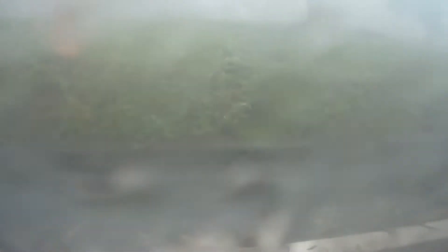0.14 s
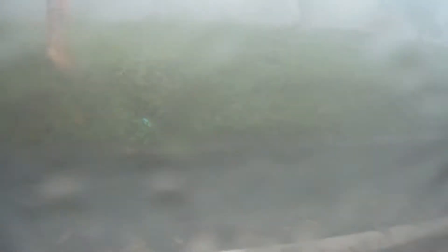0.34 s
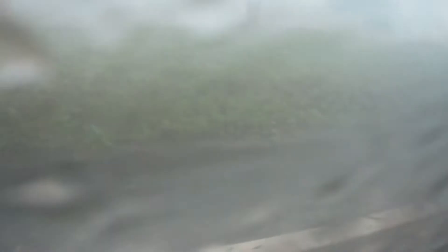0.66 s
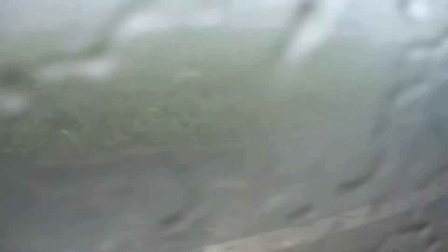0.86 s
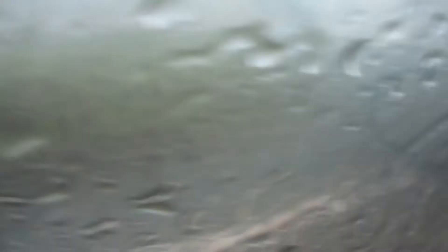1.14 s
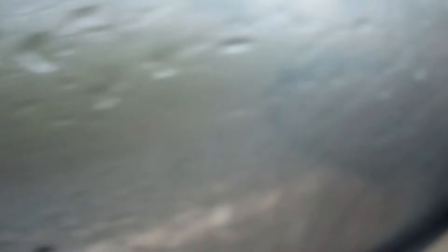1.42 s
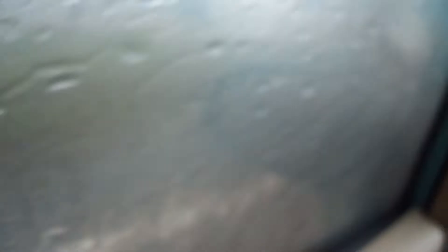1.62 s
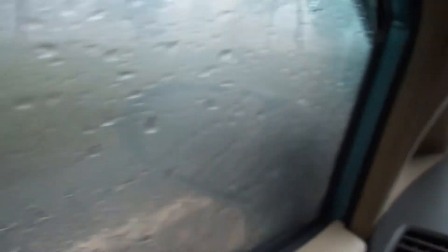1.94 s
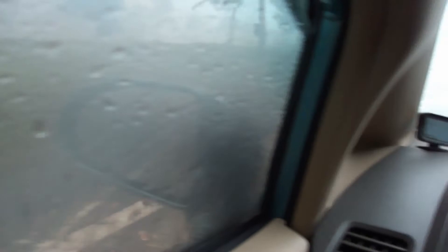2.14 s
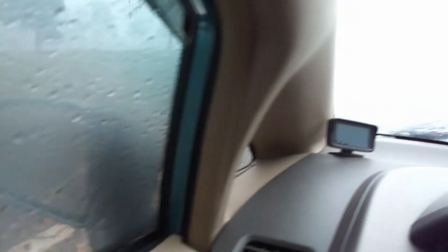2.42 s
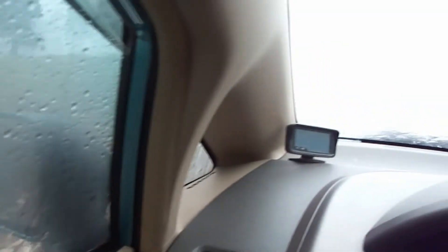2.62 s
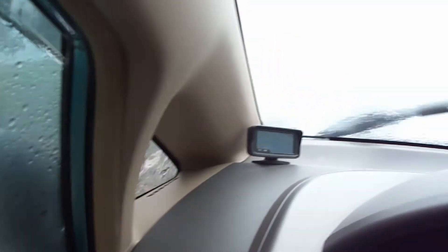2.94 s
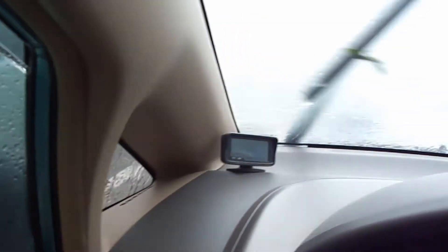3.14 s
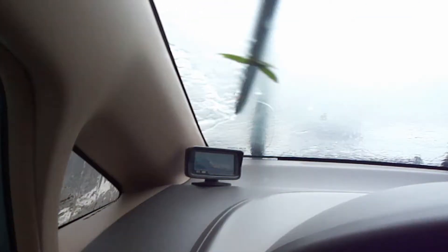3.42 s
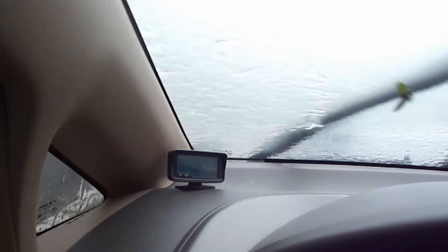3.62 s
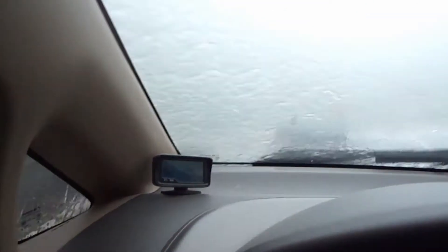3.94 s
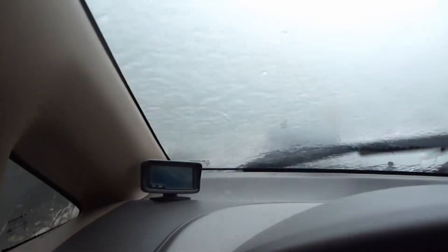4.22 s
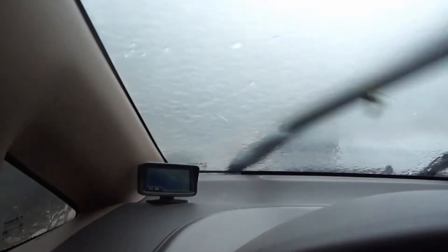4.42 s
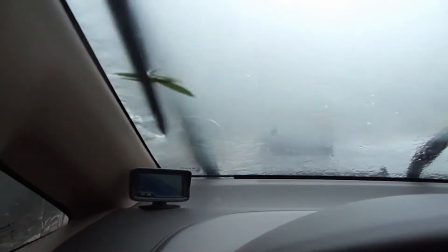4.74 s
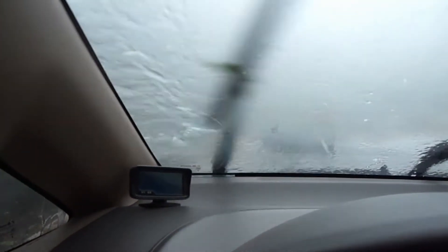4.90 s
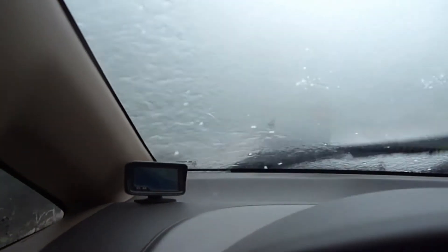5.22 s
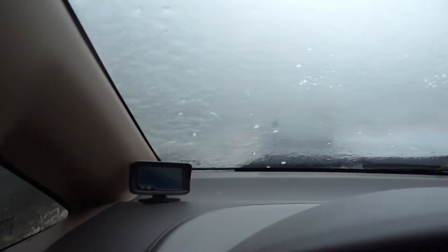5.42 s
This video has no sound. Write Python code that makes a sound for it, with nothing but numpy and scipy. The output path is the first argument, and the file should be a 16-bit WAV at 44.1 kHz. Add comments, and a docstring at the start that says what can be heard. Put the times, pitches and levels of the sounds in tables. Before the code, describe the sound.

A heavy hailstorm beats on a car, captured by a small handheld microphone in the cabin. It begins with more roof and door-panel knocking, low and woody-metallic, then turns glassier as it moves toward the windscreen. Irregular hard cracks leap out, the loudest in clusters, while the smaller rattle briefly ducks around them. Smooth rain hiss and fine ticking continue throughout, and the sound ends with the storm still falling.

```python
"""Hail cracks sharply on the glass of a car and knocks dully on its lined steel roof, heard from the front seat.
Countless smaller stones merge into a clatter that flickers in level and dips briefly, mostly around the
hardest cracks, over the hiss of rain and fine spray.
Big stones are timed bursts of coloured noise and a few modes; knocks and pings are dying sines.
The clatter sends random impulses through panel responses; loudness-following noise adds cabin reflections."""
import sys
import numpy as np
from scipy import signal
from scipy.fft import rfft, irfft, next_fast_len
from scipy.io import wavfile
from scipy.ndimage import uniform_filter1d

SR = 44100
rng = np.random.default_rng(int(sys.argv[2]) if len(sys.argv) > 2 else 0)


def master_out(mix):
    """Clip the mix to full scale and print it as 16-bit PCM to the path in sys.argv[1]."""
    frames = np.transpose(np.atleast_2d(mix))
    ceiling = np.clip(frames, -1, 1)
    pcm = np.round(ceiling * 32767).astype(np.int16)
    wavfile.write(sys.argv[1], SR, pcm)


N = 245637

# All levels below are relative; the layers get further gains when they are mixed.
# Strength of the shower on each surface. Each row: time in seconds, roof level in dB,
# thin body panel level in dB, glass level in dB.
SHOWER_STRENGTH = [(0.0, -28.5, -30.5, -29.5), (0.31, -32.5, -28, -30.5), (0.81, -33.5, -32.5, -30),
                   (1.16, -32.5, -32, -28.5), (1.43, -32, -29.5, -29), (1.6, -31.5, -31, -27.5),
                   (1.81, -33, -33.5, -29.5), (2.3, -34, -33.5, -30.5), (2.73, -36, -29.5, -29.5),
                   (3.02, -40.5, -32, -31.5), (3.54, -35.5, -34, -29.5), (3.94, -37, -29.5, -28.5),
                   (4.2, -34.5, -31.5, -32.5), (4.62, -37, -30, -29), (4.7, -35, -31.5, -31),
                   (5.14, -40, -32.5, -33), (5.57, -40, -34.5, -34.5)]
# The level of the clatter dips briefly, mostly around the hardest cracks.
# Each row: start in seconds, end in seconds, depth in dB before each surface takes its share.
CLATTER_DIPS = [(0.02, 0.06, 1), (0.537, 0.668, 2), (0.766, 0.87, 1.5), (1.17, 1.208, 3), (1.353, 1.68, 6),
                (1.784, 1.798, 9), (3.183, 3.252, 1.5), (3.486, 3.52, 2), (3.773, 3.957, 6.5),
                (3.98, 4.03, 2.5), (4.768, 4.898, 4), (5.058, 5.287, 5.5)]
# The largest stones on the glass. Each row: start in seconds, crack peak in dB, ring rms in dB,
# colour centre in Hz, which crack and ring each shift.
GLASS_HITS = [(0.0067, -20, -21.5, 2980), (0.107, -14, -27, 3040), (0.1526, -18, -28, 3380),
              (0.1837, -15, -25, 4150), (0.1946, -9, -45, 4500), (0.2862, -22, -24, 3320),
              (0.3075, -15, -23.5, 5200), (0.343, -10, -26, 4450), (0.36, -10, -23.5, 3950),
              (0.462, -11, -29, 5200), (0.5343, -1, -25, 3960), (0.672, -12, -20.5, 3260),
              (0.6871, -12, -21, 2880), (0.7046, -19, -24, 2830), (0.9141, -0.5, -35, 3940),
              (0.9557, -11, -42, 5000), (1.001, -12, -25, 3300), (1.0416, -23, -25, 3950),
              (1.0725, -8.5, -32, 5030), (1.1238, -15, -26, 4140), (1.174, -7, -41, 4740),
              (1.235, -8, -21, 3550), (1.262, -10, -28, 3420), (1.2682, -12, -29, 5140),
              (1.303, -11, -22, 3400), (1.341, -28, -20.5, 3990), (1.416, 1, -25, 4060),
              (1.486, -13, -21, 2970), (1.4913, 0, -18, 4040), (1.5719, -2, -20, 4330),
              (1.6081, -4.5, -23.5, 5230), (1.6458, -15, -28.5, 4070), (1.6842, -5, -20, 3710),
              (1.7081, -3, -34, 4560), (1.7179, -8, -30, 4030), (1.7245, -9, -16, 3780),
              (1.7715, -13, -32, 3800), (1.8015, -10, -27, 2940), (1.852, -16, -22.5, 3290),
              (1.891, -36, -19, 3880), (2.0175, -14, -36, 4200), (2.0264, -7, -22.5, 3500),
              (2.041, -11, -18, 3880), (2.069, -5, -26, 4200), (2.237, -35, -21, 3720),
              (2.3162, -22, -23, 3630), (2.3336, -18, -29, 4180), (2.4, -16, -18.5, 3640),
              (2.483, -18, -22, 2980), (2.5498, -28, -25, 2990), (2.685, -18, -23, 4900),
              (2.7091, -2.5, -28, 4200), (2.7196, -14, -30, 3800), (2.7514, -20, -23.5, 3520),
              (2.837, -7, -25, 3560), (2.9344, -23, -26, 3150), (2.992, -5.5, -21.5, 4020),
              (3.011, -6.5, -22.5, 3530), (3.0496, -14, -36, 4940), (3.094, -12, -22.5, 4200),
              (3.135, -20, -21, 2980), (3.1512, -12, -28, 3460), (3.1602, -16, -27, 3540),
              (3.1684, -11, -19.5, 3100), (3.18, -6.5, -24, 3880), (3.3457, -12, -17, 3550),
              (3.401, -30, -22, 3620), (3.431, -14.5, -22.5, 6100), (3.564, -16, -30, 2590),
              (3.614, -10, -24, 1990), (3.678, -18, -20, 2950), (3.7244, -12, -21, 2990),
              (3.8037, -1.5, -16, 3640), (3.83, -4.5, -17.5, 4760), (3.8336, -5, -23, 4200),
              (3.8732, -2, -21, 4420), (3.9581, -11, -22, 3930), (3.9652, -5, -16.5, 3500),
              (3.9772, -8, -22, 3970), (3.9933, 1, -20, 3300), (4.0462, -6, -17.5, 3500),
              (4.074, -11, -19.5, 3870), (4.104, -4, -17.5, 3280), (4.117, -6, -22, 4950),
              (4.2463, -18, -21.5, 3530), (4.29, -11, -38, 3730), (4.3548, -12, -40, 5040),
              (4.4714, -23, -22, 3230), (4.491, -1.5, -33, 3680), (4.532, -19, -28, 3980),
              (4.5422, -14, -24, 4260), (4.58, -21, -22, 3140), (4.6326, -12, -22.5, 3800),
              (4.672, -5.5, -23, 4560), (5.1035, -1, -24, 4400), (5.139, -2.5, -20, 4200),
              (5.1842, -16, -23, 3320), (5.215, -6, -18, 3500), (5.2966, -3.5, -20, 3840),
              (5.324, -4.5, -23, 2640), (5.3486, -3.5, -33, 4100), (5.364, -7, -24, 3950),
              (5.3706, -3, -15.5, 3480), (5.548, -28, -23, 3730)]
# The largest stones on the roof. Each row: start in seconds, thud rms in dB, clank rms in dB,
# thud pitch in Hz, clank pitch in Hz.
ROOF_HITS = [(0.007, -26, -34, 686, 1310), (0.076, -27, -29, 650.0, 1460), (0.187, -30, -34, 754, 1340.0),
             (0.213, -26, -53, 700.0, 1550.0), (0.238, -28, -35, 520, 1100), (0.2483, -21, -30, 800, 1050),
             (0.329, -28, -48, 580.0, 1270), (0.386, -26.5, -31, 730.0, 1390),
             (0.437, -28.5, -28, 740.0, 1430), (0.512, -33, -24.5, 680.0, 1546),
             (0.579, -31, -32, 670.0, 1400), (0.688, -28, -30, 710.0, 1560), (0.698, -21.5, -34, 716, 1500),
             (0.834, -35.5, -37, 780, 1300), (0.879, -30, -27.5, 720.0, 1610),
             (1.0603, -24.5, -25.5, 536, 1620), (1.115, -27, -32, 690.0, 1520),
             (1.28, -30.5, -33.5, 780, 1310), (1.31, -29, -23.5, 634, 1550), (1.741, -36, -34, 520.0, 1950),
             (1.849, -36, -29.5, 620.0, 1710), (1.953, -28.5, -36, 605, 1420),
             (2.13, -30.5, -32.5, 610.0, 1680), (2.216, -27, -27, 650.0, 1676),
             (2.334, -39, -41, 700, 1180), (2.368, -34.5, -30, 560.0, 1520),
             (2.394, -33.5, -34, 560.0, 1780), (2.642, -28.5, -35.5, 480, 1610),
             (2.773, -34, -38, 440.0, 1640.0), (2.894, -34, -26.5, 507, 1590), (2.931, -33, -35, 750, 1110),
             (2.956, -42, -32.5, 750.0, 1430), (3.142, -50, -32.5, 710.0, 1940),
             (3.232, -33.5, -35, 640.0, 1640.0), (3.283, -32.5, -30, 700, 1310),
             (3.304, -27.5, -28, 600.0, 1380), (3.425, -43, -31, 700, 1200), (3.443, -25, -24, 550.0, 1196),
             (3.564, -33, -24.5, 780.0, 1560), (3.611, -25, -29.5, 610, 1580), (3.724, -38, -40, 700, 1330),
             (3.96, -29.5, -34, 710, 1530.0), (4.046, -37, -31, 563, 1670.0), (4.143, -35, -26, 523, 1360),
             (4.246, -40, -31, 500.0, 1770), (4.283, -28, -28, 716, 1500), (4.349, -49, -32, 640.0, 1560),
             (4.4712, -23.5, -20.5, 580.0, 1730), (4.713, -44, -27.5, 620.0, 1200),
             (4.739, -28.5, -28.5, 620.0, 1580.0), (4.795, -38, -32, 580.0, 1580),
             (4.859, -39, -32.5, 850.0, 1470), (4.965, -30, -25, 770.0, 1740),
             (5.258, -36, -36.5, 700, 1510), (5.31, -29.5, -28, 523, 1530),
             (5.428, -48, -32.5, 550.0, 1740), (5.455, -30, -29, 570.0, 1530.0),
             (5.533, -43, -28.5, 550.0, 1370)]
# Stones on stiff spots of steel, which answer with one short pitched knock.
# Each row: start in seconds, main mode level in dB, pitch in Hz, t60 in seconds.
STEEL_KNOCKS = [(0.007, -8.5, 740, 0.034), (0.071, -16.5, 2570, 0.12), (0.102, -15, 2630, .05),
                (0.198, -12, 884, 0.028), (0.249, -0.5, 826, 0.031), (0.297, -13, 826, 0.056),
                (0.3015, -5, 1450, 0.011), (0.34, -16, 1180, 0.029), (0.439, -16, 740, 0.09),
                (0.578, -13, 1270, 0.028), (0.694, -13.5, 370, .04), (0.7004, -12, 733, 0.037),
                (0.914, -11, 700, 0.014), (1.061, -14, 1950, .03), (1.0615, -20, 364, .04),
                (1.067, -14, 590, 0.018), (1.172, -7.5, 1150, 0.022), (1.3105, -11, 1760, 0.025),
                (1.491, -11, 1020, 0.01), (1.743, -13, 380, 0.012), (1.954, -13.5, 900, 0.011),
                (2.222, -19, 1880, 0.04), (2.954, -13, 1120, 0.014), (3.57, -12, 2240, 0.039),
                (3.444, -11, 1040, .03), (3.612, -5.5, 1580, 0.033), (3.68, -12, 1870, .02),
                (3.806, -17, 1400, .018), (3.8345, -16, 1050, .014), (3.8736, -10, 420, 0.0072),
                (3.874, -7, 990, 0.007), (3.9605, -15, 1000, .02), (4.047, -21, 1100, 0.0091),
                (4.104, -12, 1490, .015), (4.355, -8, 990, 0.0076), (4.4712, -7.5, 1940, 0.049),
                (4.477, -24, 1550, 0.0072), (4.472, -15, 340, 0.032), (4.7139, -6, 1200, .018),
                (4.927, -15.5, 1520, 0.018), (4.963, -10.5, 850, 0.042), (5.139, -14, 1600, 0.019),
                (5.2155, -17, 1970, .016), (5.429, -11, 1590, 0.015)]
# Heavy stones that set a whole panel bumping.
# Each row: start in seconds, main mode level in dB, pitch in Hz, t60 in seconds.
PANEL_BUMPS = [(0.033, -29, 186, 0.081), (0.245, -39, 203, .08), (1.303, -32.5, 182, .07),
               (1.742, -27, 165, 0.037), (2.225, -30, 215, 0.067), (3.874, -26.5, 192, 0.036),
               (4.076, -35, 192, 0.054), (4.301, -33, 185, 0.11)]
# Stones that leave the glass ringing on one note.
# Each row: start in seconds, level in dB, pitch in Hz, t60 in seconds.
GLASS_PINGS = [(0.704, -14, 2600, .04), (1.341, -15, 4490, .045), (1.4165, -11, 4200, 0.018),
               (1.4915, -10, 4690, 0.045), (1.493, -9, 4000, 0.027), (1.6842, -7, 3510, 0.017),
               (1.7996, -12.5, 3200, 0.029), (2.028, -17, 2540, .04), (2.041, -13, 3960, .035),
               (3.806, -12, 3200, .014), (3.907, -15, 2980, .014), (4.586, -14, 2870, .03),
               (5.1035, -26, 3900, 0.02), (5.139, -13, 2640, 0.013), (5.139, -7.5, 6050, 0.01),
               (5.216, -8.5, 4400, 0.02), (5.372, -12, 3070, 0.026)]
# Resonances of the steel. Each row: centre in Hz, width in Hz, gain in dB.
STEEL_MODES = [(740, 240, 2), (1500, 35, -1), (1975, 37, 8), (2640, 240, 0)]
# The microphone turns from the door to the windscreen.
# Each row: time in seconds, share of the steel resonances heard (0 to 1).
NEAR_DOOR = [(0, 0.86), (1.3, 0.84), (1.7, 0.24), (5.57, 0.37)]
# What the lined roof radiates into the cabin. Each row: frequency in Hz, relative level in dB.
ROOF_SPECTRUM = [(25, -59), (70, -39), (120, -30), (190, -14), (300, -7), (400, -1), (580, -1.5),
                 (740, -4.5), (950, -7), (1400, -11), (3000, -44), (16000, -54)]
# What the thin panels radiate, also the colour of the clanks. Each row: frequency in Hz, relative level in dB.
PANEL_SPECTRUM = [(100, -44), (500, -12), (900, -6), (1150, 2), (1500, -0.5), (2000, -0.5), (2600, -2.5),
                  (4000, -2.5), (8000, -18), (16000, -62)]
# What the glass radiates under small stones. Each row: frequency in Hz, relative level in dB.
GLASS_SPECTRUM = [(100, -38), (600, -21), (1600, -13), (2300, -7), (2900, 0), (4200, -1.5), (5200, -6),
                  (7000, -11), (9000, -15.5), (16000, -20)]
# Crack and ring of the large stones on glass. Each row: frequency in Hz, relative level in dB.
CRACK_SPECTRUM = [(30, -43), (120, -14), (400, -6), (1000, -4), (2000, -1.5), (3200, 0), (4500, -3),
                  (7000, -7.5), (16000, -25)]
# The soft boom of the whole body. Each row: frequency in Hz, relative level in dB.
BOOM_SPECTRUM = [(25, -31), (60, -20), (100, -17), (170, -3), (230, 1.5), (320, -1.5), (700, -24),
                 (16000, -92)]
# The hiss of the rain. Each row: frequency in Hz, relative level in dB.
HISS_SPECTRUM = [(100, -35), (500, -7), (1500, -6.5), (3200, 1), (5000, -9), (8000, -11.5), (16000, -33)]
# Fine drops and splinters on the windscreen. Each row: frequency in Hz, relative level in dB.
SPRAY_SPECTRUM = [(500, -40), (3000, -2), (6500, 0), (9000, 0), (11500, 1), (13500, 5.5), (16000, 5.5)]
# Reflections from all round the cabin. Each row: frequency in Hz, relative level in dB.
DIFFUSE_SPECTRUM = [(30, -13), (60, -7), (110, 1), (200, 7), (450, 7), (900, 1), (2000, 5), (4000, 12.5),
                    (8000, 6.5), (16000, -4.5)]

CUTOFF_HZ = 16000
BLOW_SIZE, TONE_SIZE = 8192, 2600  # longest blow and longest pitched tone, in samples
AGE = np.arange(BLOW_SIZE) / SR  # seconds since a blow landed
DIP_FADE_S = 0.025
# The level of the small stones swings quickly at random throughout; the spray swings more quickly still.
SWINGS_PER_S, SWING_DB = 29, 1
SPRAY_SWINGS_PER_S, SPRAY_SWING_DB = 130, 1.2
# A stone that bursts on the roof throws splinters: they add to the clatter, then die away.
SPLINTER_RISE_S, SPLINTER_FALL_S = 0.0037, 0.02
# A stone that bursts on the glass throws fine chips: level against its crack, time constant of the fall.
CHIPS_DB, CHIPS_FALL_S = -28, 0.005
# Hiss and spray follow the level of the hail on the glass: share of its swing in dB.
HISS_FOLLOWS, SPRAY_FOLLOWS = 0.77, 0.6
SPRAY_DB = -44.2
# A hard crack is over sooner than a soft splat: ring time at 0 dB, and the rise in peak that halves it.
RING_T60_S, RING_HALVES_DB = 0.032, 17
# A knock has a second, inharmonic mode that dies sooner.
OVERTONE_RATIO, OVERTONE_DB, OVERTONE_T60_SHARE = 1.7, 1, 0.14
KNOCK_BASS_CUT_HZ = 260


def from_db(db):
    """Decibels to an amplitude factor."""
    return 10 ** (np.asarray(db) / 20)


def rms_one(x):
    """Scale a sound to rms 1."""
    return x / np.sqrt(np.mean(x ** 2) + 1e-20)


def add(out, s, sound):
    """Mix a sound in at a time in seconds."""
    start = int(np.clip(round(s * SR), 0, N - 1))
    out[start:start + len(sound)] += sound[:N - start]


def in_time(rows):
    """The columns of a curve, sample by sample."""
    s, *columns = np.transpose(rows)
    return [np.interp(np.arange(N) / SR, s, column) for column in columns]


def colour(x, spectrum, centre_hz=1000, bump_db=0, octaves=1.0):
    """Causal (minimum-phase) filter: a spectrum with one broad resonance on top."""
    size = 2 * next_fast_len(len(x) // 2 + 1024)
    pitch = np.log2(np.maximum(np.arange(size // 2 + 1) * SR / size, 1))
    hz, db = np.transpose(spectrum)
    distance = (pitch - np.log2(centre_hz)) / octaves
    curve_db = np.interp(pitch, np.log2(hz), db) + bump_db * np.exp(-.5 * distance ** 2)
    # folding the cepstrum onto positive time gives the minimum phase
    cepstrum = irfft(np.log(from_db(curve_db)))
    cepstrum[1:size // 2] *= 2
    cepstrum[size // 2 + 1:] = 0
    response = np.exp(rfft(cepstrum))
    return irfft(rfft(x, size) * response, size)[:len(x)]


def ringing(t60, build_s):
    """Crowded modes and reflections after one blow: they build up, then die; energy 1."""
    dying = rng.standard_normal(BLOW_SIZE) * from_db(-60 * AGE / t60)
    ring = dying * (1 - np.exp(-AGE / build_s))
    return ring / np.linalg.norm(ring)


def blow(t60, build_s, direct_db, tail_db, tail_t60):
    """The contact itself, the ring of the panel and a second tail at a level of its own."""
    contact = from_db(direct_db) * (AGE == 0)
    tail = from_db(tail_db) * ringing(tail_t60, build_s)
    return contact + ringing(t60, build_s) + tail


def at_level(sound, db, first_s):
    """Scale a blow to an rms level over its first moments."""
    return from_db(db) * sound / np.sqrt(np.mean(sound[AGE < first_s] ** 2))


def partials(centre_hz, octaves, t60, count=3):
    """The few modes that the struck spot favours; energy 1."""
    hz = np.minimum(centre_hz * 2 ** rng.normal(0, octaves, (count, 1)), CUTOFF_HZ)
    signs = rng.choice([-1, 1], (count, 1))
    modes = np.sum(signs * np.sin(2 * np.pi * hz * AGE), axis=0)
    ring = modes * from_db(-60 * AGE / t60)
    return ring / np.linalg.norm(ring)


def bend(pulse, slowness, count=6):
    """Bending waves carry the highs faster than the lows: all-passes turn a pulse into a tiny chirp."""
    a = np.clip(slowness, 0, .9)
    return signal.sosfilt([[-a, 1, 0, 1, -a, 0]] * count, pulse)


def restrike(sound, within_s, again_db, count=3):
    """Weaker repeats just after a blow: pieces of the stone, or waves back from the edge of the panel."""
    out = sound.copy()
    lags = (rng.uniform(0.0968, 1, count) * within_s * SR).astype(int) + 1
    for lag in lags:
        out[lag:] += from_db(again_db + rng.normal(0, 2.5)) * sound[:-lag]
    return out


def resonance(x, hz, width_hz):
    """Two-pole band-pass with gain 1 on top."""
    r = np.exp(-np.pi * width_hz / SR)
    zeros = np.array([1, 0, -1]) * (1 - r * r) / 2
    poles = [1, -2 * r * np.cos(2 * np.pi * hz / SR), r * r]
    return signal.lfilter(zeros, poles, x)


def radiated(x):
    """A small ringing spot radiates little bass: a high-pass."""
    return signal.sosfilt(signal.butter(2, KNOCK_BASS_CUT_HZ, "high", fs=SR, output="sos"), x)


def dips():
    """How far the level of the clatter has dipped, in dB, with a short fade at either end of each dip."""
    s = np.arange(N) / SR
    dip_db = np.zeros(N)
    for start, end, depth_db in CLATTER_DIPS:
        inside_s = np.minimum(s - start, end - s)
        dip_db += depth_db * np.clip(inside_s / DIP_FADE_S + .5, 0, 1)
    return dip_db


def swings(per_s, depth_db):
    """Quick swings in level, in dB: straight lines between random steps."""
    steps = rng.standard_normal(1000)
    return depth_db * np.interp(np.arange(N) / SR * per_s, np.arange(len(steps)), steps)


def splinters():
    """Amplitude of the patter after the stones on the roof; a louder clank throws more."""
    puff = (1 - np.exp(-AGE / SPLINTER_RISE_S)) * np.exp(-AGE / SPLINTER_FALL_S)
    out = np.zeros(N)
    for s, _, clank_db, _, _ in ROOF_HITS:
        add(out, s, from_db(clank_db) * puff)
    return out


def flow(shower_db, gain_db, dip_share, splinter_db):
    """Level of the small stones on one surface, in dB: the shower with its dips and swings, plus splinters."""
    falling_db = shower_db + gain_db - dip_share * dips() + swings(SWINGS_PER_S, SWING_DB)
    thrown = from_db(splinter_db) * splinters()
    return 20 * np.log10(np.hypot(from_db(falling_db), thrown))


def clatter(spectrum, per_s, spread_db, t60, direct_db, centre_hz, bump_db, count=16):
    """Small stones land at random on many spots of one surface; the flow is evened out to an rms near 1."""
    lands = rng.random(N) < per_s / SR
    sizes = from_db(spread_db * np.clip(rng.standard_normal(N), -2, 1.8)) * lands
    spots = rng.integers(0, count, N)
    out = np.zeros(N)
    # the spots are tuned from an octave below the centre to an octave above
    for k, pitch in enumerate(np.linspace(-1, 1, count)):
        response = blow(t60, build_s=0.00047, direct_db=direct_db, tail_db=-12, tail_t60=0.29)
        response = colour(response, spectrum, centre_hz * 2 ** pitch, bump_db, octaves=0.61)
        response = rms_one(bend(response, slowness=0.49))
        out += signal.oaconvolve(sizes * (spots == k), response)[:N]
    power = uniform_filter1d(uniform_filter1d(out ** 2, size=3000), size=2200)
    return out / np.sqrt(np.abs(power) + 1e-9)


def tone(hz, t60):
    """One struck mode: a dying sine."""
    age = AGE[:TONE_SIZE]
    return np.sin(2 * np.pi * hz * age) * np.exp(-np.log(1000) * age / t60)


def knock(hz, t60):
    """A stiff spot rings in its main mode and one overtone."""
    overtone = tone(hz * OVERTONE_RATIO, t60 * OVERTONE_T60_SHARE)
    return tone(hz, t60) - from_db(OVERTONE_DB) * overtone


def play(rows, voice):
    """Sound a table of pitched blows with one voice."""
    out = np.zeros(N)
    for s, level_db, hz, t60 in rows:
        add(out, s, from_db(level_db) * voice(hz, t60))
    return out


def pitched_patter(per_s, low_hz, high_hz, cycles, spread_db):
    """Middling stones at random, each a separate little knock with a pitch and length of its own; rms 1."""
    out = np.zeros(N)
    draws = rng.random((int(per_s * N / SR), 4))
    for k, (when, pitch, size, length) in enumerate(draws):
        hz = low_hz * (high_hz / low_hz) ** pitch
        t60 = cycles * (.5 + length) / hz
        add(out, (k + 2 * when) / per_s, from_db(spread_db * size) * knock(hz, t60))
    return rms_one(radiated(out))


def small_stones_on_steel(roof_db, panel_db):
    """Dull clatter of the lined roof and brighter clatter of the thin panels."""
    roof = clatter(ROOF_SPECTRUM, per_s=170, spread_db=1.0, t60=0.068, direct_db=-5.5,
                   centre_hz=545, bump_db=-1.5)
    panels = clatter(PANEL_SPECTRUM, per_s=180, spread_db=2.0, t60=0.088, direct_db=-4.5,
                     centre_hz=1470, bump_db=6.5)
    return from_db(roof_db - 3.5) * roof + from_db(panel_db - 7.5) * panels


def middling_stones_on_steel(roof_db, panel_db):
    """Little knocks that stand out of the clatter, low on the roof and higher on the panels."""
    roof = pitched_patter(per_s=45, low_hz=330, high_hz=900, cycles=17, spread_db=8)
    panels = pitched_patter(per_s=65, low_hz=1000, high_hz=2700, cycles=20, spread_db=8)
    return from_db(roof_db - 7.5) * roof + from_db(panel_db - 11.5) * panels


def body_boom():
    """The whole body answers random stones with a soft, steady boom."""
    return from_db(-48) * clatter(BOOM_SPECTRUM, per_s=70, spread_db=0.0, t60=0.095, direct_db=-2,
                                  centre_hz=147, bump_db=5.0)


def small_stones_on_glass(glass_db):
    """Bright clatter on the glass, with middling stones as short high knocks."""
    small = clatter(GLASS_SPECTRUM, per_s=200, spread_db=5.0, t60=0.054, direct_db=-1.5,
                    centre_hz=4200, bump_db=14.0)
    middling = pitched_patter(per_s=110, low_hz=2600, high_hz=5200, cycles=32, spread_db=9)
    return from_db(glass_db - 3.0) * small + from_db(glass_db - 8) * middling


def chips():
    """Amplitude of the fine spray just after the stones on the glass; a harder crack throws more."""
    out = np.zeros(N)
    for s, peak_db, _, _ in GLASS_HITS:
        add(out, s, from_db(peak_db + CHIPS_DB) * np.exp(-AGE / CHIPS_FALL_S))
    return out


def rain(glass_db):
    """Drops and splinters tick finely on the windscreen over a smooth hiss; both follow the level of the hail."""
    swell_db = glass_db - np.mean(glass_db)
    spray = clatter(SPRAY_SPECTRUM, per_s=700, spread_db=4.5, t60=.012, direct_db=0,
                    centre_hz=8000, bump_db=3)
    falling = from_db(SPRAY_DB + SPRAY_FOLLOWS * swell_db + swings(SPRAY_SWINGS_PER_S, SPRAY_SWING_DB))
    hiss = rms_one(colour(rng.standard_normal(N), HISS_SPECTRUM))
    return np.hypot(falling, chips()) * spray + from_db(-34 + HISS_FOLLOWS * swell_db) * hiss


def glass_hits(crack_db, ring_db, bump_db):
    """Ice on glass: one hard chirp with its echo from the frame, then a scattered ring, shorter the harder the crack."""
    out = np.zeros(N)
    for s, peak_db, rms_db, centre_hz in GLASS_HITS:
        crack = colour(1. * (AGE == 0), CRACK_SPECTRUM, centre_hz * 1.28, bump_db, octaves=0.85)
        crack = bend(crack, slowness=0.598)
        crack = restrike(crack, within_s=0.0024, again_db=-10.0, count=2)
        add(out, s, from_db(peak_db + crack_db) * crack / np.abs(crack).max())

        t60 = RING_T60_S * 2 ** (-peak_db / RING_HALVES_DB)
        ring = ringing(t60, build_s=0.00047)
        ring += from_db(-4.0) * ringing(t60=0.039, build_s=0.0092)
        ring += from_db(-9) * partials(centre_hz, octaves=0.32, t60=t60)
        ring = colour(ring, CRACK_SPECTRUM, centre_hz * 1.01, bump_db=6.5, octaves=1.0)
        add(out, s, at_level(ring, rms_db + ring_db, first_s=0.007))
    return out


def roof_hits(thud_db, clank_db):
    """Ice on steel: a low thud with a faint boom, and a brighter clank, each spot with a pitch of its own."""
    out = np.zeros(N)
    for s, low_db, high_db, thud_hz, clank_hz in ROOF_HITS:
        thud = blow(t60=0.12, build_s=0.0017, direct_db=-0.5, tail_db=-7, tail_t60=0.13)
        thud = colour(thud, ROOF_SPECTRUM, thud_hz, bump_db=3.5, octaves=0.48)
        thud = restrike(thud, within_s=0.01293, again_db=-10.5)
        add(out, s, at_level(thud, low_db + thud_db, first_s=0.035))

        boom = blow(t60=0.25, build_s=0.0017, direct_db=-12.0, tail_db=-10.5, tail_t60=0.19)
        boom = colour(boom, BOOM_SPECTRUM)
        add(out, s, at_level(boom, low_db + thud_db - 20.5, first_s=0.045))

        clank = blow(t60=0.073, build_s=0.00058, direct_db=-7.5, tail_db=-22.0, tail_t60=0.21)
        clank += from_db(-15.0) * partials(clank_hz, octaves=0.393, t60=0.045)
        clank = colour(clank, PANEL_SPECTRUM, clank_hz, bump_db=3.5, octaves=0.41)
        clank = restrike(clank, within_s=.017, again_db=-8.5)
        add(out, s, at_level(clank, high_db + clank_db, first_s=0.047))
    return out


def steel(roof_db, panel_db):
    """Roof and body panels: hits and clatter excite the sheet's resonances; knocks, bumps and boom join them."""
    near, = in_time(NEAR_DOOR)
    out = small_stones_on_steel(roof_db, panel_db) + roof_hits(thud_db=-1.0, clank_db=1.5)
    modes = sum(from_db(db) * resonance(out, hz, width_hz) for hz, width_hz, db in STEEL_MODES)
    out += near * modes
    out += middling_stones_on_steel(roof_db, panel_db) + body_boom()
    out += from_db(-2.5) * radiated(play(STEEL_KNOCKS, knock))
    return out + play(PANEL_BUMPS, knock)  # the bumps keep their bass


def glass_pings():
    """Stones that leave the glass ringing: single dying sines without bass."""
    return from_db(-1) * radiated(play(GLASS_PINGS, tone))


def cabin_reflections(hail):
    """Scattered reflections: coloured noise that follows the loudness of the hail."""
    loudness = np.sqrt(np.abs(uniform_filter1d(hail ** 2, size=260)))
    return from_db(-26.0) * loudness * rms_one(colour(rng.standard_normal(N), DIFFUSE_SPECTRUM))


def scene():
    """Steel and glass under the hail, and the rain that falls with it, in stereo."""
    roof_db, panel_db, glass_db = in_time(SHOWER_STRENGTH)
    roof_db = flow(roof_db, gain_db=2.5, dip_share=0.54, splinter_db=-2.0)
    panel_db = flow(panel_db, gain_db=6.0, dip_share=1.0, splinter_db=-11.0)
    glass_db = flow(glass_db, gain_db=3.0, dip_share=1.52, splinter_db=1.0)
    hail = steel(roof_db, panel_db)
    hail += small_stones_on_glass(glass_db) + rain(glass_db)
    hail += glass_hits(crack_db=-0.5, ring_db=-0.5, bump_db=10) + glass_pings()
    # the reflections have opposite sign in the two channels, which widens the sound
    side = cabin_reflections(hail)
    return np.array([from_db(-1.98) * (hail + side), from_db(-1.75) * (hail - side)])


def record(dry):
    """The highest peaks are rounded; the small microphone loses the deep bass and the top is cut."""
    top = 1.1  # amplitude that the rounded peaks approach
    rounded = top * np.tanh(dry / top)
    high_pass = signal.butter(2, 32, "high", fs=SR, output="sos")  # bass cut in Hz
    low_pass = signal.ellip(10, .1, 80, CUTOFF_HZ, fs=SR, output="sos")
    return signal.sosfilt(np.vstack([high_pass, low_pass]), rounded)


dry = scene()
out = record(dry)
master_out(out)
```